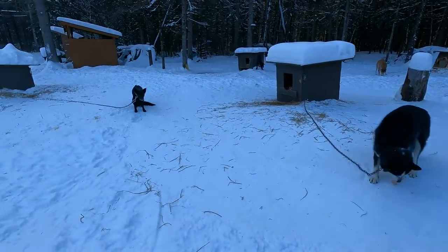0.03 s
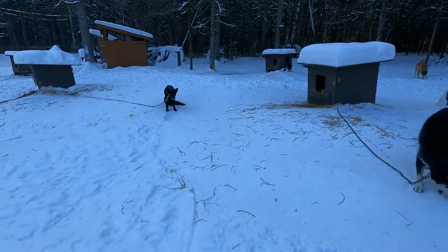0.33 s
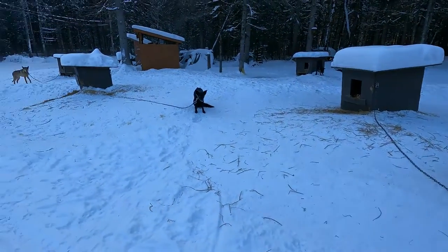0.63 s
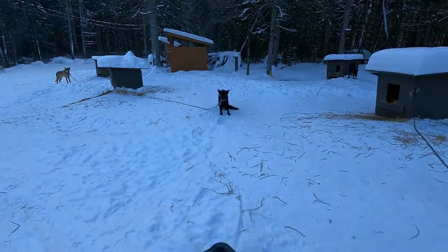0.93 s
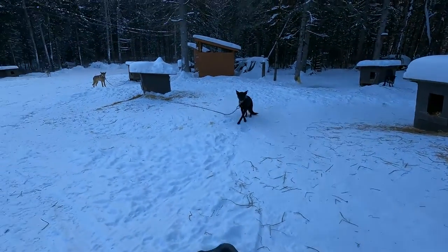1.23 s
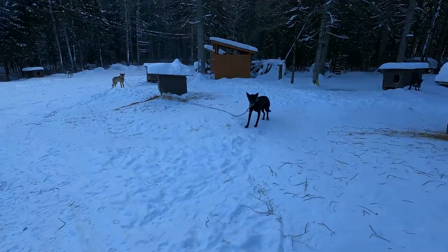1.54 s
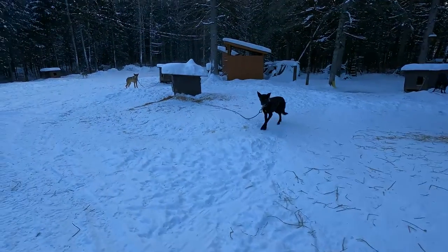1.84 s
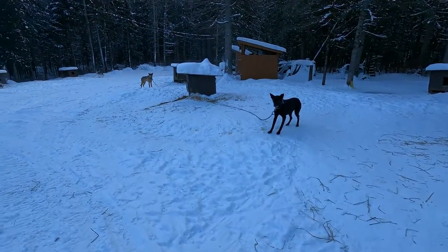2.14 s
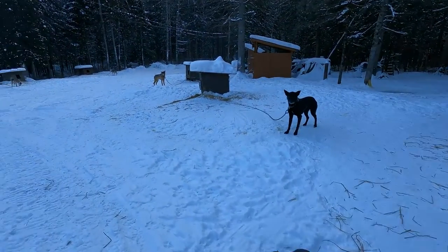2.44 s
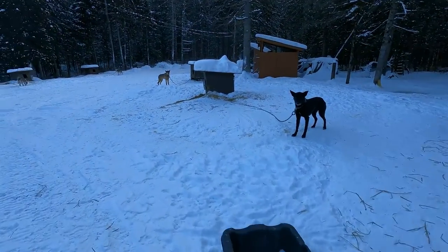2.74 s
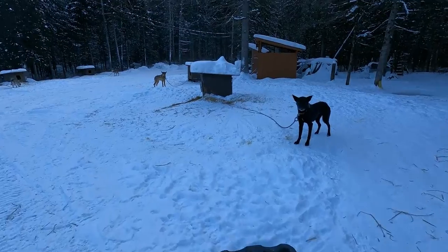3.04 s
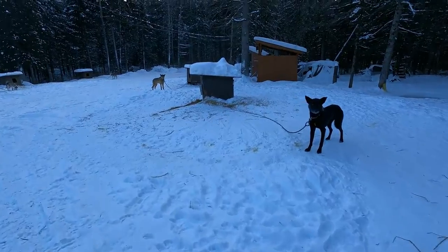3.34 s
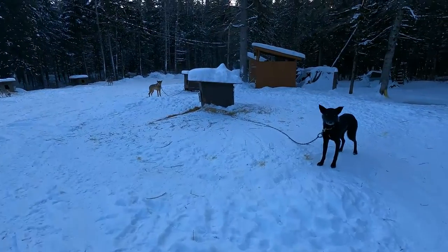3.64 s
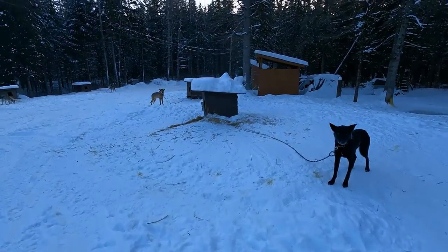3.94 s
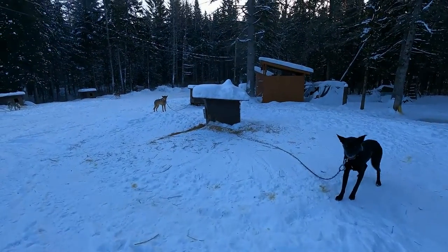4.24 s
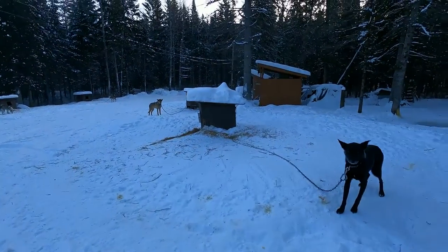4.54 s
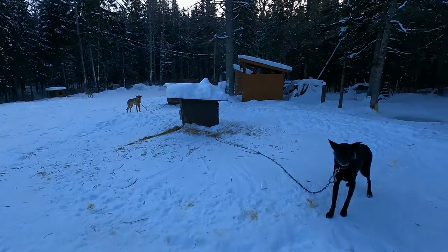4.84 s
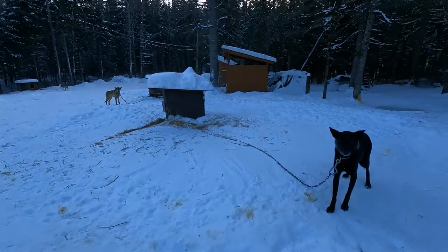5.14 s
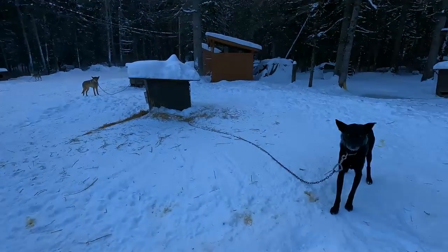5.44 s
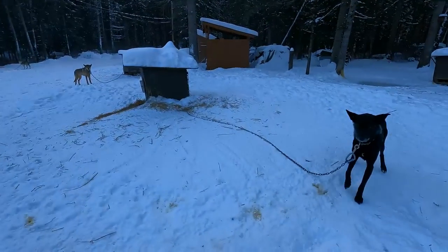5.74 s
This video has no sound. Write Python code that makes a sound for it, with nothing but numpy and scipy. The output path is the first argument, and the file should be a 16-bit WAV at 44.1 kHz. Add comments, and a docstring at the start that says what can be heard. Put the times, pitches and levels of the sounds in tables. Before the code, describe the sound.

A plastic sled scrapes and knocks over hard snow in four long pulls, with crunching boot steps in the gaps.

```python
"""A faint boot step, then the scrape of a plastic sled, dragged close by over hard, cold snow.
In four long pulls, ice grains hiss and grate under the hull, which rumbles and knocks over frozen ruts.
Between the pulls a boot packs the snow: single cracks crowd into a dull, creaking crunch.
The sled is a little to the right of the boots, and a faint outdoor hush lies behind both."""
import sys
import numpy as np
from scipy import signal
from scipy.fft import rfft, irfft, next_fast_len
from scipy.io import wavfile
from scipy.ndimage import uniform_filter1d

SR = 44100
rng = np.random.default_rng(int(sys.argv[2]) if len(sys.argv) > 2 else 0)


def wav_out(sig):
    """Save sig, one row per channel (or a flat mono array), as 16-bit PCM at SR to the path in sys.argv[1]."""
    wavfile.write(sys.argv[1], SR, np.round(np.clip(np.atleast_2d(sig).T, -1, 1) * 32767).astype(np.int16))


N = 255294


def from_db(db):
    """Turn decibels into a gain, the number a sound is multiplied by."""
    return 10 ** (np.asarray(db) / 20)


def rms_one(x):
    """Scale a sound so that its average (RMS) level is 1."""
    return x / np.sqrt(np.mean(x ** 2) + 1e-20)


def at_hz(points, hz):
    """Read a curve of (frequency, value) points at any frequency."""
    known_hz, values = np.transpose(points)
    return np.interp(np.log(hz + 1e-3), np.log(known_hz), values)


def bursts(rows, rise_s, fall_s):
    """A gain that rises, holds and fades for each row of (time [s], length [s], level [dB])."""
    t, out = np.arange(N) / SR, np.zeros(N)
    for start, length, db in rows:
        rise = np.clip((t - start) / rise_s, 0, 1)
        fall = np.exp(-np.maximum(t - start - length, 0) / fall_s)
        out += from_db(db) * rise * fall
    return out


def drift(rate_hz):
    """A smooth random wobble with a typical size of 1; a higher rate wobbles faster."""
    r = np.exp(-40 * np.pi * rate_hz / SR)
    noise = rng.standard_normal(N // 20 + 2002)   # one value per 20 samples
    slow = signal.lfilter([1], [1, -2 * r, r * r], noise)[2000:]
    return np.interp(np.arange(N) / 20, np.arange(len(slow)), rms_one(slow))


def keep_band(x, hz, kind, order=3):
    """Keep the "low" or the "high" side of a frequency."""
    return signal.sosfilt(signal.butter(order, hz, kind, fs=SR, output="sos"), x)


def click(spectrum, size=4096):
    """A click with the given tone and its energy packed at the start (minimum phase); peak 1."""
    gains = from_db(at_hz(spectrum, np.fft.rfftfreq(size, 1 / SR)))
    cepstrum = irfft(np.log(gains))
    cepstrum[1:size // 2] *= 2
    cepstrum[size // 2 + 1:] = 0
    pulse = irfft(np.exp(rfft(cepstrum)))
    return pulse / np.abs(pulse).max()


def colour(x, spectrum):
    """Give a sound the tone of a spectrum."""
    return signal.oaconvolve(x, click(spectrum))[:N]


def steady(x, window_s):
    """Even out the level to 1, keeping any roughness quicker than the window."""
    power = np.abs(uniform_filter1d(x ** 2, int(window_s * SR)))
    return x / np.sqrt(power + 1e-4 * np.mean(x ** 2))


def grains(per_s, spread_db):
    """Tiny breaks at random times; a few are much louder (or softer, if the spread is negative)."""
    sizes = from_db(spread_db * np.minimum(rng.exponential(1, N), 4))
    signs = rng.choice([-1, 1], N)
    happens = rng.random(N) < per_s / SR
    return rms_one(sizes * signs * happens)


def resonate(x, hz, width_hz):
    """Make a sound ring at one pitch; a narrower width rings longer."""
    r = np.exp(-np.pi * width_hz / SR)
    feedback = [1, -2 * r * np.cos(2 * np.pi * hz / SR), r * r]
    return signal.lfilter(np.array([1, 0, -1]) * (1 - r * r) / 2, feedback, x)


def thud(hz, cycles, rise_s, size=4096):
    """A soft hit rings one note, which fades by 60 dB over the given cycles; peak 1."""
    t = np.arange(size) / SR
    wave = np.sin(2 * np.pi * hz * t) * from_db(-60 * t * hz / cycles) * (1 - np.exp(-t / rise_s))
    return wave / np.abs(wave).max()


def snap(pulse, crumble_s, crumbs):
    """One break followed by a brief spray of crumbs; peak 1."""
    t = np.arange(len(pulse)) / SR
    spray = crumbs * rng.standard_normal(len(pulse)) * np.exp(-t / crumble_s)
    spray[0] = 1   # the break itself
    wave = signal.fftconvolve(spray, pulse)[:len(pulse)]
    return wave / np.abs(wave).max()


def add(out, start_s, wave):
    """Mix a short sound in at the given time."""
    at = max(int(start_s * SR), 0)
    out[at:at + len(wave)] += wave[:N - at]


# Tone of the outdoor air: (frequency [Hz], level [dB])
AIR_TONE = [(18, -61), (30, -21), (171, 0.5), (472, 8.5), (716, -7), (1030, 2), (1970, -4.5), (2370, -10),
            (3150, -8), (3980, -12), (5300, -9.5), (10200, -23.5), (12200, -28), (15000, -42)]
def outdoor_hush():
    """A faint, gently wavering hush."""
    hush = rms_one(colour(grains(per_s=3500, spread_db=3.0), AIR_TONE))
    return from_db(-51.5) * hush * from_db(drift(rate_hz=8.0))


# Boot steps: (touch [s], full weight [s], lift [s], creak level [dB],
# first touch against the creak [dB], dull sinking against the creak [dB])
BOOT_STEPS = [(0.0, 0.136, 0.15, -47, 4, -20), (1.44, 1.778, 1.885, -29.5, -21.5, -21),
              (3.165, 3.459, 3.6, -27.5, -15, -10), (5.011, 5.231, 5.3, -28.5, -17, -4.5)]
def boot_weight(lag_s=0, layer_db=0, fall_s=0.016):
    """Gain of the steps: a boot rests lightly, takes the weight, holds it and lifts quickly."""
    t, out = np.arange(N) / SR - lag_s, np.zeros(N)
    swell_db_per_s = 116
    offsets_db = np.broadcast_to(layer_db, len(BOOT_STEPS))
    for (touch, full, lift, db, touch_db, _), offset_db in zip(BOOT_STEPS, offsets_db):
        swell = from_db(np.clip(swell_db_per_s * (t - full), touch_db, 0))
        since_lift = np.maximum(t - lift, 0)
        settling = from_db(-10) * np.exp(-since_lift / 0.061)   # the snow goes on settling
        release = np.maximum(np.exp(-since_lift / fall_s), settling)
        out += from_db(db + offset_db) * (t >= touch) * swell * release
    return out


# Tone of snow being packed: (frequency [Hz], level [dB])
PACKING_TONE = [(24, -108), (40, -11), (85, -10.5), (158, 3), (182, 4), (308, 0), (411, -0.5), (467, -3),
                (590, -4), (746, -7.5), (961, -9), (1740, -22), (3000, -40), (4500, -37), (8000, -64)]
# Tone of fine ice grains, under boot or sled: (frequency [Hz], level [dB])
HISS_TONE = [(1180, -13.5), (2000, -2), (2140, -2), (2600, -2.5), (3580, -4.5), (4890, -4), (6140, -7.5),
             (7450, -7), (8240, -14), (9360, -17), (10800, -21.5), (12300, -20.5), (13800, -33),
             (14600, -44)]
# Loose powder, one value per step: (level against the creak [dB])
STEP_POWDER_DB = [-9, -19, -18.5, -19]
def boot_crunches():
    """Snow gives way in small slips, few under a light foot and crowded under full weight."""
    tread = boot_weight()
    weight = np.clip(tread / from_db(-31), 0.18, 1)
    slips = grains(per_s=380 * weight, spread_db=1.5)
    slips += from_db(-0.5) * weight * grains(per_s=4000, spread_db=2.5)
    packing = colour(slips, PACKING_TONE)
    creak = steady(keep_band(packing, 418, "low"), window_s=0.038) * tread
    crunch = steady(keep_band(packing, 352, "high"), window_s=0.021) * boot_weight(layer_db=-4.5)
    # The snow sinks and spills a moment after the weight arrives.
    sinking = steady(keep_band(packing, 120, "low"), window_s=0.04)
    sinking *= boot_weight(lag_s=0.073, layer_db=[step[-1] for step in BOOT_STEPS])
    spill = slips + from_db(19) * grains(per_s=9100, spread_db=6.0)
    powder = steady(colour(spill, HISS_TONE), window_s=0.094)
    powder *= boot_weight(lag_s=0.0041, layer_db=STEP_POWDER_DB, fall_s=0.05)
    catch = from_db(drift(rate_hz=54))   # the sole catches and slips
    return catch * (creak + crunch) + sinking + powder


# The crust cracks under a boot: (time [s], peak level [dB], thud against the crack [dB])
CRUST_CRACKS = [(1.616, -34, -18), (1.704, -34, -7), (1.871, -21, -6), (1.899, -22.5, -1), (1.93, -23, -7),
                (3.258, -29.5, -4), (3.301, -30.5, -19), (3.332, -27, -12), (3.364, -31.5, 5),
                (3.446, -23, -20), (3.67, -26, 2), (5.065, -30, -5), (5.098, -35.5, 1), (5.121, -31, -3),
                (5.149, -27.5, -9), (5.175, -27, -5), (5.412, -31.5, 6.5), (5.489, -32, -6)]
# Tone of one crack: (frequency [Hz], level [dB])
CRACK_TONE = [(100, -47.5), (400, 11.5), (1000, 6), (1400, 5), (2200, -11.5), (5000, -24), (8000, -16),
              (14000, -55)]
def crust_cracks(extra_per_step=4):
    """The crust snaps, the broken plate rings with a short pop, and the sinking boot thuds."""
    out, pulse = np.zeros(N), click(CRACK_TONE)
    # Small extra cracks come at random as the weight builds.
    small = [(rng.uniform(touch, full), rng.normal(-35.5, 3), -8)
             for touch, full, *_ in BOOT_STEPS for _ in range(extra_per_step)]
    for start, db, thud_db in CRUST_CRACKS + small:
        sink_hz = 130 * from_db(rng.normal(0, 1.6))
        pop_hz = 940 * from_db(rng.normal(0, 1.4))
        sink = from_db(thud_db) * thud(sink_hz, cycles=2.9, rise_s=0.008)
        pop = from_db(-10) * thud(pop_hz, cycles=11, rise_s=0.0014)
        crack = snap(pulse, crumble_s=0.0022, crumbs=0.1)
        add(out, start, from_db(db) * (crack + pop + sink))
    return out


# The sole twists on cold snow: (time [s], length [s], level [dB])
SOLE_TWISTS = [(1.848, 0.023, -32.5), (1.896, 0.0071, -32), (3.552, 0.033, -30.5), (5.266, 0.014, -45)]
def boot_squeaks():
    """Quick sticking and slipping rings the sole at a middle pitch."""
    slips = grains(per_s=500, spread_db=2.5)
    rub = resonate(resonate(slips, hz=760, width_hz=420), hz=700, width_hz=570)
    return steady(rub, window_s=0.0042) * bursts(SOLE_TWISTS, rise_s=0.0012, fall_s=0.003)


# The sled's speed written as loudness, one list per pull: (time [s], level [dB])
PULL_SPEEDS = [
    [(0.147, -44), (0.2, -36), (0.29, -44.0), (0.38, -37.5), (0.5, -35), (0.58, -31), (0.95, -31.5),
     (1.1, -34), (1.29, -35.5), (1.36, -54.5), (1.42, -59)],
    [(2.183, -48), (2.22, -30.0), (2.38, -34.0), (2.48, -29), (2.51, -42), (2.78, -29), (2.99, -39.5),
     (3.16, -55.5)],
    [(3.757, -35.5), (3.8, -27), (3.89, -32), (3.98, -30), (4.32, -29.5), (4.56, -34), (4.72, -45.5),
     (4.86, -62)],
    [(5.503, -38.5), (5.53, -24), (5.63, -32.5), (5.68, -26.5), (5.78, -26)],
]
def pull_gain(walking_db, follows):
    """Gain that is walking_db at walking pace and follows a share of the speed's swings in dB."""
    t, out = np.arange(N) / SR, np.zeros(N)
    walking_pace_db, start_s, stop_s = -32, 0.003, 0.026
    for pull, db in zip(PULL_SPEEDS, np.broadcast_to(walking_db, len(PULL_SPEEDS))):
        times, speed_db = np.transpose(pull)
        rise = np.clip(1 + (t - times[0]) / start_s, 0, 1)
        fall = np.exp(-np.maximum(t - times[-1], 0) / stop_s)
        swing_db = np.interp(t, times, speed_db) - walking_pace_db
        out += rise * fall * from_db(db + follows * swing_db)
    return out


# Thin ice splinters with a bright tick: (time [s], length [s], level [dB])
ICE_SPLINTERS = [(1.623, 0.004, -45), (1.988, 0.0027, -48), (3.087, 0.0032, -44.5), (3.114, 0.0055, -40.5),
                 (3.668, 0.0076, -47.5)]
def ice_ticks():
    """Lone crystals snap all the time as the crust settles, and louder under the sliding hull."""
    settling = from_db(-65.5) * rms_one(colour(grains(per_s=64, spread_db=11.0), CRACK_TONE))
    crystals = colour(grains(per_s=220, spread_db=-6.0), HISS_TONE)
    crackle = rms_one(keep_band(crystals, 1100, "high", order=2))
    crackle *= pull_gain(walking_db=-46, follows=0.75)
    shards = keep_band(colour(grains(per_s=8400, spread_db=1.0), HISS_TONE), 3200, "high", order=1)
    splinters = steady(shards, window_s=0.005) * bursts(ICE_SPLINTERS, rise_s=0.00043, fall_s=0.002)
    return settling + crackle + splinters


# The hull slaps down: (time [s], length [s], level [dB])
HULL_SLAPS = [(0.941, 0.0073, -25.5), (2.181, 0.0012, -20), (2.494, 0.0052, -50), (3.767, 0.036, -28),
              (5.514, 0.049, -25)]
def hull_slaps():
    """The flat of the hull hits the crust with a dry, mid-range crack."""
    crack = keep_band(grains(per_s=18000, spread_db=-3.0), 1950, "low")
    crack = keep_band(crack, 290, "high", order=2)
    return steady(crack, window_s=0.0038) * bursts(HULL_SLAPS, rise_s=0.00033, fall_s=0.0069)


# The hull crosses bare ice: (time [s], length [s], level [dB])
BARE_ICE = [(0.554, 0.0087, -34), (0.604, 0.009, -28), (0.784, 0.018, -18), (0.866, 0.03, -20),
            (2.265, 0.012, -26), (2.627, 0.004, -27.5), (2.671, 0.0046, -24), (2.787, 0.0048, -33)]
# Notes the plastic rings at: (frequency [Hz], width before damping [Hz], relative level [dB])
PLASTIC_NOTES = [(520, 45, 9), (750, 12, 11), (910, 14, 13.5), (1310, 64, 9.5), (1610, 7, 6.5),
                 (1740, 25, 9.5), (2110, 20, -6), (2420, 23, 9), (2860, 75, -1), (3550, 14, 10),
                 (4190, 190, -4), (5200, 43, -6)]
def hull_rasps():
    """Hard ice makes the plastic chatter at its higher notes, and the contact cuts their ring short."""
    chatter, damping_hz = grains(per_s=5300, spread_db=2.5), 25
    rings = sum((-1) ** k * from_db(db) * resonate(chatter, hz, width + damping_hz)
                for k, (hz, width, db) in enumerate(PLASTIC_NOTES))
    scratch = from_db(-2.5) * rms_one(colour(chatter, HISS_TONE))
    rasp = steady(rms_one(rings) + scratch, window_s=0.0025)
    return rasp * bursts(BARE_ICE, rise_s=0.001, fall_s=0.005)


# A tug or a ridge presses the hull into the snow: (time [s], length [s], rumble [dB], boom [dB])
HULL_JOLTS = [(0.151, 0.074, -31, -54), (0.209, 0.076, -34, -30), (0.587, 0.42, -43.5, -37.5),
              (0.929, .09, -24, -39), (1.019, 0.32, -35, -41), (2.179, 0.087, -20.5, -21),
              (2.309, 0.14, -24.5, -37), (2.476, 0.045, -29, -30.5), (2.654, 0.022, -24, -29),
              (3.763, 0.11, -18.5, -28), (3.931, 0.073, -24, -49), (4.433, 0.16, -25.5, -42),
              (4.675, 0.069, -33.5, -45), (5.518, 0.084, -20, -36)]
# Tone of the bending hull: (frequency [Hz], level [dB])
BOOM_TONE = [(15, 4), (35, -3.5), (52, -14.5), (70, 13), (87, -3.5), (110, -10), (180, 4.5), (400, -86)]
def hull_booms():
    """The whole shell bends slowly under the load and gives a deep boom."""
    flex = steady(colour(grains(per_s=710, spread_db=0.5), BOOM_TONE), window_s=0.044)
    jolts = [(start, length, db) for start, length, _, db in HULL_JOLTS]
    pressed = bursts(jolts, rise_s=0.00078, fall_s=0.051)
    return flex * (pressed + pull_gain(walking_db=-62, follows=0.4))


def jolt_gain():
    """Gain of the extra rumble while a jolt loads the hull."""
    return bursts([jolt[:3] for jolt in HULL_JOLTS], rise_s=0.0017, fall_s=0.022)


# Hull rumble at walking pace, one value per pull: (level [dB])
PULL_RUMBLE_DB = [-40, -30.5, -31, -27]
def rumble_gain():
    """Gain of the hull's rumble: speed and jolts together."""
    return np.hypot(pull_gain(PULL_RUMBLE_DB, follows=0.4), jolt_gain())


# The hull hits a deep rut: (time [s], thud peak [dB], pitch [Hz], clack against the thud [dB])
DEEP_RUTS = [(0.218, -14, 235, -14), (0.247, -18, 213, -20), (0.805, -14, 207, -5), (0.9, -15.5, 188, -0.5),
             (0.942, -15.5, 292, 2), (1.003, -14, 205, -6), (1.097, -13.5, 230, -7), (1.32, -21.5, 225, -6),
             (2.181, -16, 197, 3), (2.317, -14.5, 240, -14), (2.357, -13.5, 248, -4), (2.493, -9, 302, 3.5),
             (2.554, -12.5, 211, -9), (2.687, -10.5, 174, -6.5), (2.972, -12, 187, -11),
             (3.027, -19, 179, -26), (3.088, -13.5, 190, -8.5), (3.119, -19, 183, -4),
             (3.403, -19, 226, -9), (3.797, -14, 267, 0), (3.876, -16.5, 155, 2.5), (4.015, -9.5, 246, -20),
             (4.258, -12, 250, -23), (4.325, -10.5, 296, -10.5), (4.43, -11, 373, -8),
             (4.645, -12.5, 474, -1), (4.737, -21.5, 254, -2), (4.951, -21, 250, -17),
             (4.957, -20, 258, -17), (4.99, -24, 288, -19), (5.022, -32, 240, -12)]
# Tone of the hollow clack: (frequency [Hz], level [dB])
CLACK_TONE = [(100, -33), (350, -11.5), (530, 4.5), (800, -7), (980, -12), (1400, -22.5), (3000, -30),
              (7000, -51), (14000, -70)]
def hull_knocks():
    """Snow muffles the hull, so each rut gives just a hollow clack and a short thud."""
    out, pulse, rumble = np.zeros(N), click(CLACK_TONE), rumble_gain()
    hits = [(start, from_db(db), hz, clack_db) for start, db, hz, clack_db in DEEP_RUTS]
    # Shallow ruts add random bumps, whose strength follows the rumble.
    bumps_per_s, bump_hz, spread_octaves, bump_clack_db = 7.7, 215, 0.33, -6
    for at in np.flatnonzero(rng.random(N) < bumps_per_s / SR):
        peak = rumble[at] * from_db(rng.normal(2, 2))
        hz = bump_hz * 2 ** rng.normal(0, spread_octaves)
        hits.append((at / SR, peak, hz, bump_clack_db))
    knock_delay_s = 0.0015   # each clack and thud sounds this long after its listed time
    for start, peak, hz, clack_db in hits:
        clack = from_db(clack_db) * snap(pulse, crumble_s=0.015, crumbs=0.024)
        body = thud(hz, cycles=8, rise_s=0.0015)
        add(out, start + knock_delay_s, peak * (body + clack))
    return out


def shifting_contact(x, depth_db, rate_hz, bands):
    """The patch touching the snow keeps changing, so narrow ranges of pitch flare and fade separately."""
    size = next_fast_len(N)
    spectrum, hz = rfft(x, size), np.fft.rfftfreq(size, 1 / SR)
    band = np.round(np.interp(np.log(hz + 1), np.log([600, 13000]), [0, bands - 1]))
    return sum(irfft(spectrum * (band == k), size)[:N] * from_db(depth_db * drift(rate_hz))
               for k in range(bands))


# Tone of the hull on lumps and coarse grains: (frequency [Hz], level [dB])
SLIDE_TONE = [(35, -12.5), (60, -2.5), (112, -2.5), (237, 5.5), (290, 3), (449, -7), (559, -7.5),
              (653, -10), (788, -15), (950, -9.5), (1400, -15.5), (1950, -17), (2500, -28), (3250, -71),
              (5500, -120)]
# Grating at walking pace, one value per pull: (level [dB])
PULL_GRATING_DB = [-35, -34, -34, -33]
def sled_sliding():
    """Lumps shake the hull, coarse grains grate and fine ones hiss; all follow the shaky contact."""
    judder = drift(rate_hz=52)
    lumps = colour(grains(per_s=800, spread_db=2.5) * from_db(0.64 * judder), SLIDE_TONE)
    coarse = colour(grains(per_s=3500, spread_db=1.5) * from_db(0.21 * judder), SLIDE_TONE)
    coarse += from_db(-8) * resonate(coarse, hz=900, width_hz=15)   # the hull rings along
    fine = colour(grains(per_s=14000, spread_db=2.0) * from_db(0.61 * judder), HISS_TONE)
    rumble = keep_band(keep_band(lumps, 605, "low"), 90, "high", order=2)
    rumble = steady(rumble, window_s=0.031) * rumble_gain()
    grating = steady(keep_band(coarse, 532, "high"), window_s=0.077)
    grating *= np.hypot(pull_gain(PULL_GRATING_DB, follows=0.62), from_db(-7) * jolt_gain())
    hiss = steady(keep_band(fine, 1960, "high"), window_s=0.17)
    hiss *= pull_gain(walking_db=-33, follows=0.98)
    surge = from_db(1.4 * drift(rate_hz=25))   # the load on the hull wavers
    return rumble + surge * shifting_contact(grating + hiss, depth_db=2.0, rate_hz=32, bands=32)


# Sound scattered to the sides: (frequency [Hz], level against the middle [dB])
SIDE_SCATTER = [(60, -31), (250, -23), (500, -25), (1000, -14), (2000, -5.5), (4000, -8), (5800, -6.5),
                (7000, -32), (10000, -7)]
# How far the left channel runs ahead of the right: (frequency [Hz], phase [rad])
LEFT_LEAD = [(300, -0.03), (1000, 0.66), (2200, -0.14), (3400, -1.08), (5000, -0.3), (6800, 0.16)]
def in_stereo(x, balance):
    """Left and right differ in level and timing; each grain also comes from a slightly different side."""
    size = next_fast_len(N + 4096)
    hz, sign = np.fft.rfftfreq(size, 1 / SR), np.array([[1], [-1]])
    scatter = from_db(at_hz(SIDE_SCATTER, hz)) * np.exp(1j * np.pi / 4)
    side = rfft(x * drift(rate_hz=147), size) * scatter
    level = from_db(sign * at_hz(balance, hz) / 2)
    phase = np.exp(1j * sign * at_hz(LEFT_LEAD, hz) / 2)
    return irfft((rfft(x, size) + sign * side) * level * phase, size)[:, :N]


# Balance of a sound on the right: (frequency [Hz], left minus right [dB])
ON_THE_RIGHT = [(150, -0.5), (500, -4), (900, -5), (1600, -7), (2800, -6), (4200, -8.5), (5800, -6),
                (7200, -3), (12000, 0.5)]
# Balance of a sound straight ahead: (frequency [Hz], left minus right [dB])
AHEAD = [(150, 0.23), (1000, 0.57), (1600, 0.3), (2600, 2.2), (4200, 0.65), (6000, 0.2), (7200, 2.3),
         (12000, 1.1)]
# The sled swings toward the walker's line: (time [s], share on the right [0 to 1])
SLED_PATH = [(4.898, 0.55), (5.4, 0.28)]
def scene():
    """The sled slides to the right of the boots, over a faint outdoor hush."""
    sled = sled_sliding() + hull_rasps() + hull_slaps() + hull_booms() + hull_knocks() + ice_ticks()
    boots = boot_crunches() + crust_cracks() + boot_squeaks()
    air = outdoor_hush()
    right = np.interp(np.arange(N) / SR, *np.transpose(SLED_PATH))
    return in_stereo(sled * right, ON_THE_RIGHT) + in_stereo(sled * (1 - right) + boots + air, AHEAD)


def record(dry):
    """Cut the highest treble steeply, above 15 kHz."""
    return signal.sosfilt(signal.ellip(10, 0.1, 80, 15000, fs=SR, output="sos"), dry)


dry = scene()
out = record(dry)
wav_out(out)
```